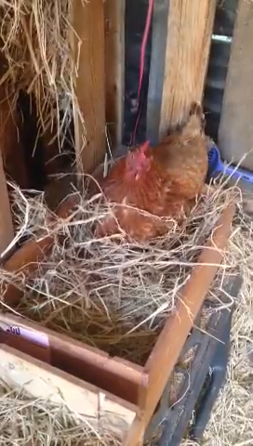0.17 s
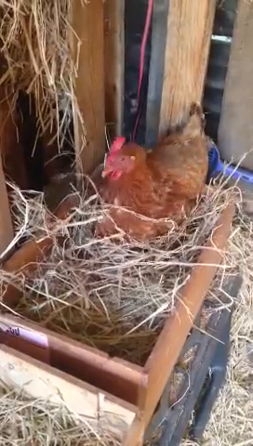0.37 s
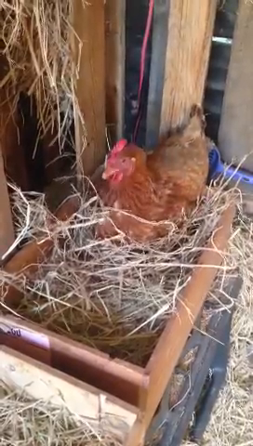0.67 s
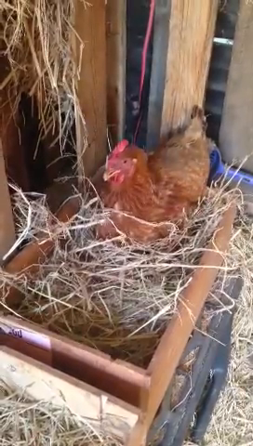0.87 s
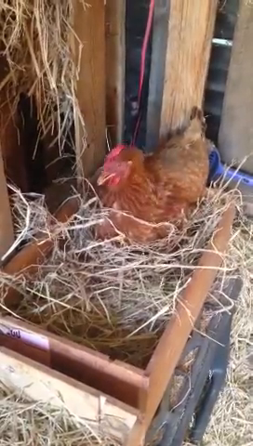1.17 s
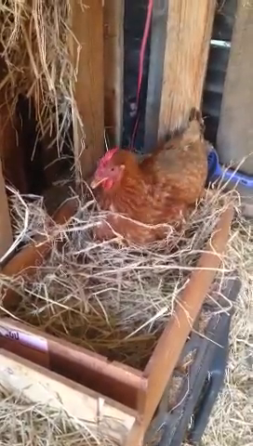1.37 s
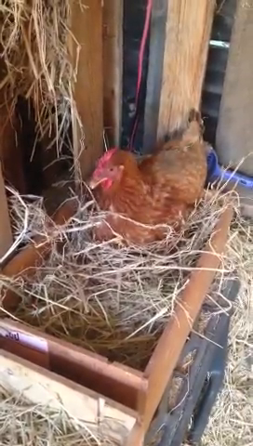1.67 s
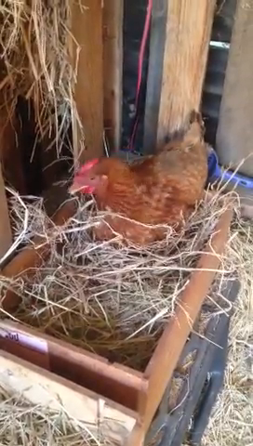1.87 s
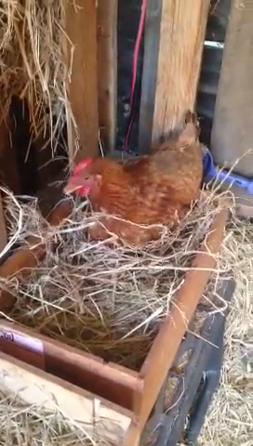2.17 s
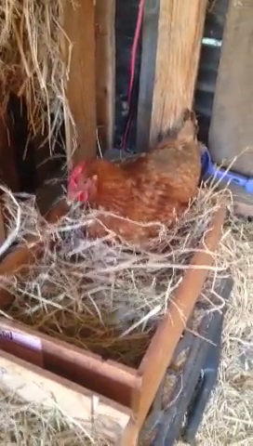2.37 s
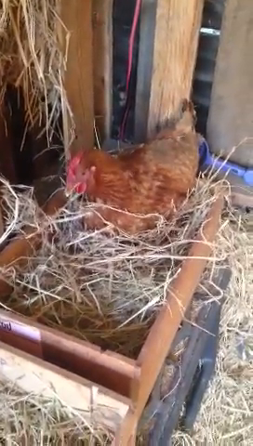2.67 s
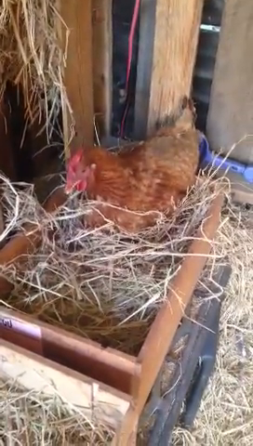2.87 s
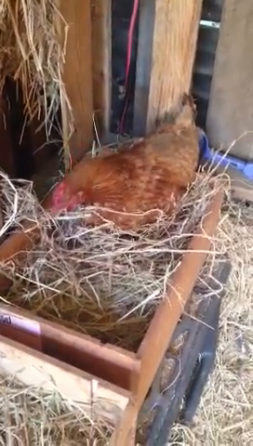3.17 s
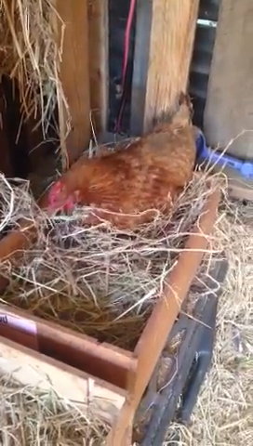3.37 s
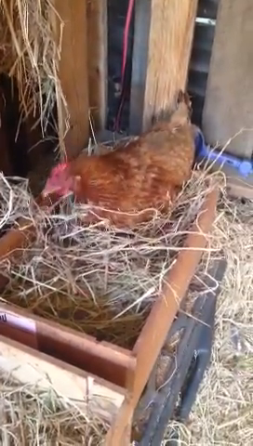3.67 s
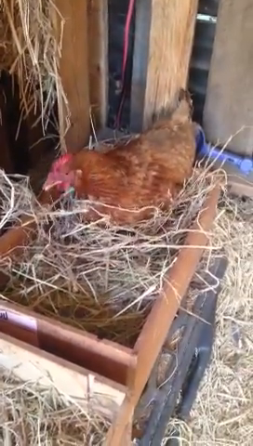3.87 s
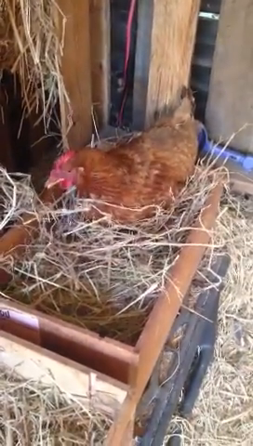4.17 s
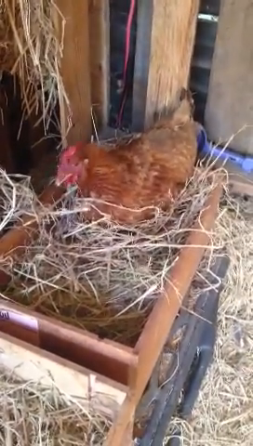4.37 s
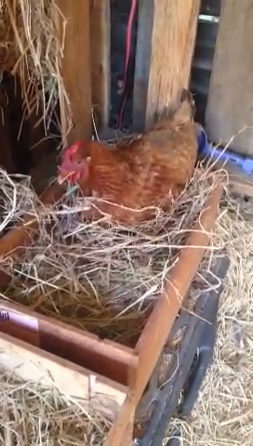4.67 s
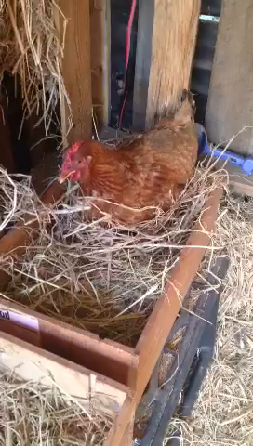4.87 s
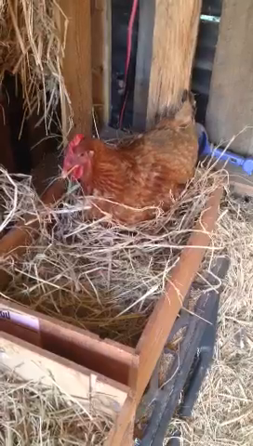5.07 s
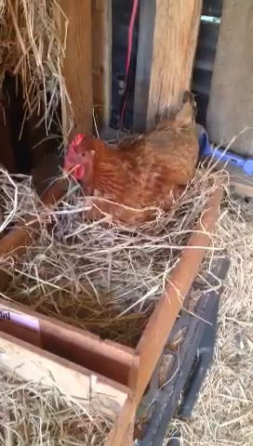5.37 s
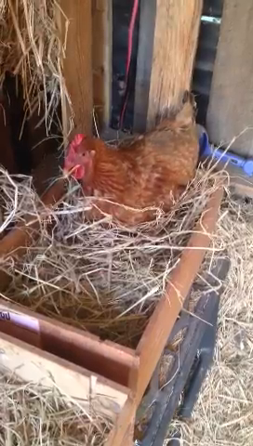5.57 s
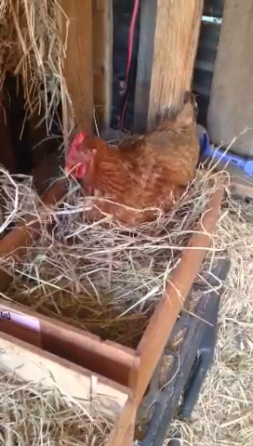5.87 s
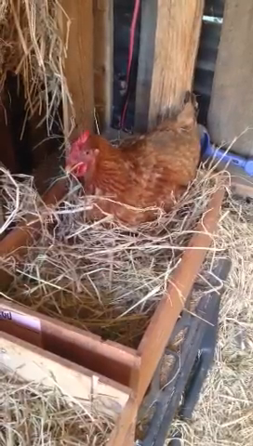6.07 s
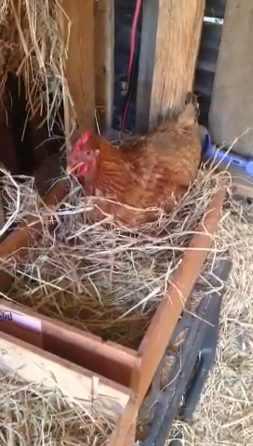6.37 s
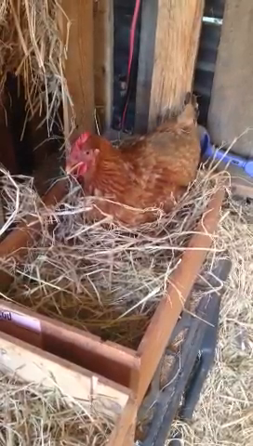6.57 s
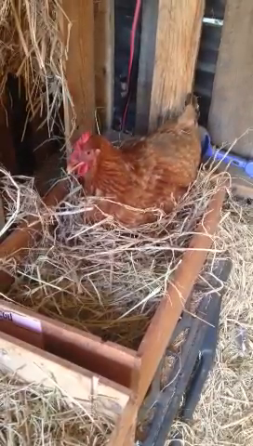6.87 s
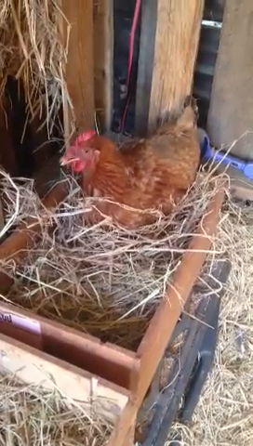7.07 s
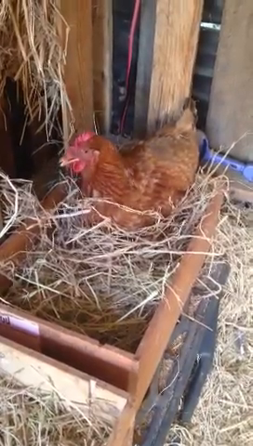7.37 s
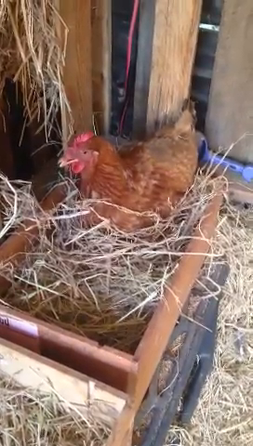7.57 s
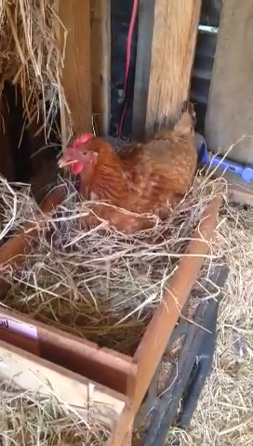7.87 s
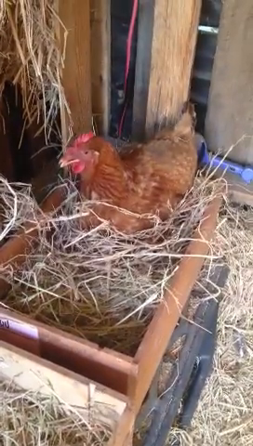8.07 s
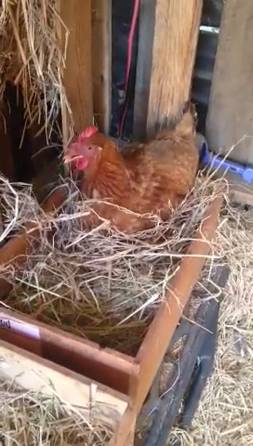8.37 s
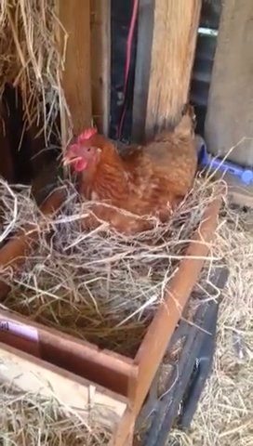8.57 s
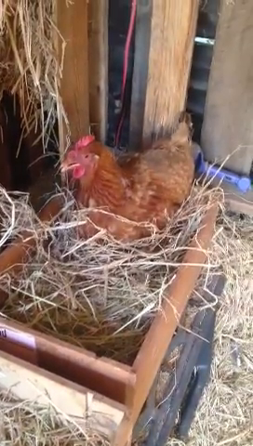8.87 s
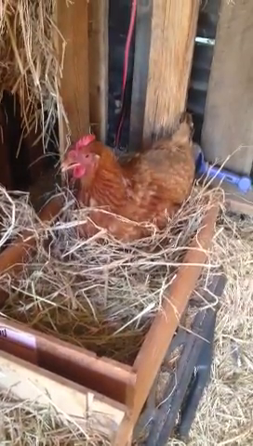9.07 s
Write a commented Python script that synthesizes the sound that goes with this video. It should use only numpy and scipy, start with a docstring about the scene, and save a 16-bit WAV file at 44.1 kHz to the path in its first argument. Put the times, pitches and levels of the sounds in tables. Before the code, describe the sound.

A hen hisses, draws out one swelling moan, then clucks in a fast, even run that grows louder and harsher.

```python
"""A straw-lined nest box in a quiet shed: a hen hisses, draws out one swelling moan, then clucks in a
fast, ever harsher run. Her voice has two registers: a rasp of uneven membrane slaps whose rate climbs
at the start of each cluck, and a clear tone near 470 Hz. Throat and beak resonances colour both.
Straw cracks under her twice; the wooden box adds a short ring."""
import sys
import numpy as np
from scipy import signal
from scipy.fft import rfft, irfft
from scipy.io import wavfile
from scipy.ndimage import uniform_filter1d

SR = 44100
rng = np.random.default_rng(int(sys.argv[2]) if len(sys.argv) > 2 else 0)


def pcm_store(signal):
    """Save signal as 16-bit PCM."""
    levels = np.round(np.clip(np.atleast_2d(signal), -1, 1) * 32767)
    wavfile.write(sys.argv[1], SR, levels.astype(np.int16).T)


N = 405719
TIME = np.arange(N) / SR
FREQS = np.fft.rfftfreq(8192, 1 / SR)

# Moan contour: time_s, pitch_hz, level_db
MOAN = [(0.5, 593, -54), (0.53, 541, -46.5), (0.654, 526, -52.5), (0.688, 575, -53.5), (0.738, 510, -43.5),
        (0.78, 549.6, -48.5), (0.994, 474, -38.5), (1.072, 550, -38), (1.14, 476.4, -33),
        (1.248, 487, -27.5), (1.278, 558, -35.5), (1.3, 567, -51)]
# Clucks: start_s, length_s, level_db, swell_db, treble_re_level_db, mouth_re_level_db,
# clear_after_s, clear_for_s, clear_pitch_hz, glide_hz, residual_rasp_share
CLUCKS = [ (1.443, 0.11, -32, -10.5, -44, -24, 0.0031, 0.079, 485.7, -30, 0.17),
          (1.508, .14, -35, 9.5, -29, -10, 0, .138, 486.5, 50, 0.28),
          (1.759, 0.14, -33, -1.5, -44, -36, 0.0017, 0.13, 502, 3, 0.06),
          (2.023, .13, -32, 9, -43.5, -31, 0.011, 0.11, 462, 12, 0.1),
          (2.264, .101, -25.5, 1.5, -20, -17, 0.0083, .1, 466, -12, .13),
          (2.5, .09, -25, -0.5, -28.5, -11, 0.001, 0.081, 452, 9.5, 0.37),
          (2.715, 0.1, -25.5, 4.5, -21.5, -8, 0, 0.089, 444, -20, 0.37),
          (2.962, 0.1048, -26, 7, -19, -8.5, .036, .068, 471, 35.5, 0.21),
          (3.195, 0.081, -20, -0.5, -36, -30, 0.0051, 0.069, 468, 19.5, 0.13),
          (3.4, .096, -20.5, -2, -35, -32, 0.002, .096, 453, -3, 0.19),
          (3.609, 0.086, -21, 8.5, -18, -11, 0.0032, 0.074, 458, -10, 0.34),
          (3.835, 0.085, -25, 10, -10, -3.5, 0.032, 0.046, 458, 9, 0.46),
          (4.04, .094, -24, 1.5, -12, -7, 0.044, 0.041, 468, 40, 0.5),
          (4.265, .124, -23, 3.5, -13.5, -8, .045, 0.081, 467, 44, 0.54),
          (4.515, .115, -24.5, -0.5, -11.5, -8.5, .057, .053, 460, 37.5, 0.5),
          (4.738, 0.1, -23.5, 0.5, -10.5, -7.5, 0.062, 0.025, 480, 24.5, 0.4),
          (4.947, 0.098, -24, -3, -9, -7.5, 0.042, .02, 490, 29, 0.8),
          (5.173, 0.098, -23, -4, -13.5, -8, 0.07, 0.042, 492, 65.5, 0.7),
          (5.399, 0.11, -22.5, -3.5, -11.5, -7.5, 0.07, .045, 475, 13.5, 0.8),
          (5.643, 0.15, -25, -4, -9, -6, 0.12, .03, 478, 35, 0.8),
          (5.899, 0.11, -23.5, 1.5, -9.5, -6.5, .058, .021, 453, -26.5, 0.9),
          (6.129, 0.1, -24, -4.5, -7.5, -7, 0.052, 0.047, 494, -13, 0.5),
          (6.328, 0.11, -23, 0, -7, -5.5, 0.054, 0.078, 469, -29.5, .52),
          (6.54, .088, -23, -3, -8, -5, .045, .04, 466, -49, 0.7),
          (6.615, 0.047, -25, -5, -4.5, -3.5, .036, .015, 460, -10, 0.5),
          (6.752, 0.073, -22.5, 10.5, -7, -5.5, 0.045, 0.041, 497, -42.5, .82),
          (6.962, 0.13, -22.5, 0, -8.5, -3.5, 0.065, .044, 454, -10, 0.42),
          (7.201, 0.14, -25.5, -7.5, -8.5, -4.5, 0.061, 0.046, 467, -45, 0.5),
          (7.428, 0.093, -25, -4, -6, -4.5, 0.073, 0.03, 460, -23.5, .85),
          (7.639, 0.13, -23.5, 1, -6.5, -3.5, 0.057, 0.022, 458, -19.5, 0.7),
          (7.893, 0.15, -25, -4, -5.5, -3.5, 0.055, 0.032, 475, -36, .41),
          (8.207, 0.17, -22, -4, -8.5, -2.5, 0.081, 0.036, 468, -50.5, 0.4),
          (8.522, .124, -23, -2.5, -7.5, -4, 0.07, 0.037, 474.4, -20, .28),
          (8.641, 0.065, -21.5, 6, -4.5, 0.5, .034, .024, 466, -23.5, 0.54),
          (8.877, 0.21, -22, 1, -8.5, -3.5, .086, .068, 448.2, -19, 0.5)]
# Lower throat resonances: centre_hz, width_hz, gain_db
THROAT_MODES = [(229.4, 56, -15.5), (390, 40, -26.5), (481, 160, -21.5), (724.2, 40, -5.5),
                (864.2, 53, 4.5), (1020, 150, -6)]


def undb(db):
    """Decibels to gain."""
    return 10 ** (np.asarray(db) / 20)


def unit(x):
    """Scale to rms 1."""
    return x / np.sqrt(np.mean(x ** 2))


def ramp(x):
    """Limit to 0-1."""
    return np.clip(x, 0, 1)


def arc(progress, from_db):
    """Rounded rise from from_db to unity over progress 0-1."""
    foot = np.sqrt(undb(from_db))
    return (foot + (1 - foot) * ramp(progress)) ** 2


def gate(start_s, end_s, edge_s):
    """1 between two times, with linear flanks."""
    return ramp(np.minimum(TIME - start_s, end_s - TIME) / edge_s + .5)


def smooth(x, span_s):
    """Triangular running mean."""
    size = max(1, int(span_s * SR))
    return uniform_filter1d(uniform_filter1d(x, size), size)


def even(x):
    """Hold short-term rms at 1; single pulses still differ."""
    return x / np.sqrt(np.abs(smooth(x ** 2, .016)) + 1e-4 * np.mean(x ** 2))


def walk(rate_hz):
    """Smooth random drift, rms 1."""
    return unit(smooth(rng.standard_normal(N), 1 / rate_hz))


def colour(x, gain):
    """Minimum-phase filter with the given gain at FREQS."""
    cepstrum = irfft(np.log(gain + 1e-7))
    half = len(cepstrum) // 2
    cepstrum[1:half] *= 2
    cepstrum[half + 1:] = 0
    impulse = irfft(np.exp(rfft(cepstrum)))[:half]
    return signal.fftconvolve(x, impulse)[:N]


def resonate(x, modes, tuning=1):
    """Steep-sided resonances (centre_hz, width_hz, gain_db); tuning scales the centres."""
    f = FREQS + 1
    power = 0
    for hz, width_hz, db in modes:
        detune = (f - (hz * tuning) ** 2 / f) / (2 * width_hz)
        power += undb(db) ** 2 / (1 + 2 * detune ** 2) ** 2
    return colour(x, np.sqrt(power))


def split(x, hz):
    """Bands below and above hz."""
    low = signal.sosfiltfilt(signal.butter(4, hz, fs=SR, output="sos"), x)
    return low, x - low


def clicks(times_s, sizes):
    """Band-limited impulses at exact times."""
    out, taps = np.zeros(N), np.arange(-8, 9)
    at = np.asarray(times_s)[:, None] * SR
    index = at.astype(int) + taps
    pulses = np.asarray(sizes)[:, None] * np.sinc(index - at) * np.hanning(len(taps))
    np.add.at(out, np.clip(index, 0, N - 1), pulses)
    return out


def shed(level_db=-63.5, drift_db=-.46):
    """Quiet background air, wavering slightly in level."""
    # Air spectrum: freq_hz, relative_density_db
    spectrum = [(15, -59.5), (25, -30.5), (169, -5.5), (240, -11), (349, -2.5), (433, -10.5), (537, -9),
                (666, -17), (1340, -16.5), (1900, -22.5), (3530, -23), (14300, -25.5), (15500, -24.5)]
    hz, db = np.transpose(spectrum)
    gain = undb(np.interp(np.log(FREQS + 1), np.log(hz), db))
    air = colour(rng.standard_normal(N), gain)
    return unit(air) * undb(level_db + drift_db * walk(19))


def nest_box(x, ring_hz=1010, ring_t60_s=.16, ring_db=-15, tail_db=-19, tail_t60_s=.17, damp_hz=3500):
    """Close boards reflect, the air in the box rings, the shed adds a short dull tail."""
    # Board echoes: delay_s, gain_db
    echoes = [(.0042, -17), (.0086, -21.5), (0.0162, -12)]
    t = TIME[:SR // 2]
    delays_s, db = np.transpose(echoes)
    boards = clicks(delays_s, undb(db))[:len(t)]
    fade = undb(-60 * t / ring_t60_s)
    ring = 2 * np.cos(2 * np.pi * ring_hz * t) * fade / fade.sum()
    tail = rng.standard_normal(len(t)) * undb(-60 * t / tail_t60_s) * (t > .006)
    tail = signal.sosfilt(signal.butter(1, damp_hz, fs=SR, output="sos"), tail / np.linalg.norm(tail))
    return x + signal.fftconvolve(x, boards + undb(ring_db) * ring + undb(tail_db) * tail)[:N]


def straw(decay_s=.015):
    """Dry stalks give way, each in a short crackle."""
    # Stalk cracks: start_s, level_db
    cracks = [(2.199, -61.5), (8.437, -58)]
    envelope = sum(undb(db) * (TIME > s) * np.exp(-np.abs(TIME - s) / decay_s) for s, db in cracks)
    return envelope * unit(resonate(rng.standard_normal(N), [(2400, 1200, -1), (4800, 2900, -3.5)]))


def hiss():
    """Unvoiced turbulence through throat and open beak."""
    # Breath contour: time_s, level_db
    contour = [(0, -56), (.1, -51), (.28, -46.5), (.41, -46.5), (.44, -77), (.59, -72), (.62, -47),
               (.66, -52.5), (.7, -71), (1.0, -65.5), (1.27, -60), (1.33, -89.5)]
    # Airway resonances: centre_hz, width_hz, gain_db
    airway_modes = [(863, 180, 10), (1251, 83, 10.5), (1586, 74, 3), (2300, 570, -13.5), (3820, 600, -15)]
    air = even(resonate(rng.standard_normal(N), airway_modes))
    return air * undb(np.interp(TIME, *np.transpose(contour)))


def pops():
    """The airway opens before some clucks: one slap rings the throat."""
    # Airway openings: time_s, peak_db
    openings = [(1.429, -47), (1.748, -49), (2.005, -45), (2.248, -44), (2.487, -38), (2.694, -43.5),
                (2.942, -30.5), (3.175, -42.5), (3.383, -39), (3.596, -39.5), (3.822, -30), (4.036, -30.5),
                (4.938, -37)]
    times_s, db = np.transpose(openings)
    ring = resonate(clicks(times_s, undb(db)), THROAT_MODES)
    return ring * undb(db.max()) / np.abs(ring).max()


def throat(slaps, calls, shut_ratio=.98, open_ratio=1.022, lift_at_s=.027, lift_s=.043):
    """Lower throat resonances start low in each call and rise as it opens."""
    lift = ramp(sum(gate(start + lift_at_s, end + lift_s / 2, lift_s) for start, end in calls))
    shut, wide = (resonate(slaps, THROAT_MODES, ratio) for ratio in (shut_ratio, open_ratio))
    return even((1 - lift) * shut + lift * wide)


def beak(x, shift=.026, notch_hz=2960, notch_width_hz=170, notch_db=-9):
    """Resonances drift as the open beak moves; a side cavity absorbs a band and its third multiple."""
    # Open-beak resonances: centre_hz, width_hz, gain_db
    open_modes = [(2039, 127, -7.5), (2350, 47, -18.5), (2452, 78, 6.5), (2200, 27, 0.5),
                  (2930, 210, -12.5), (3466, 130, -8.5), (3430, 83, -8.5), (3836, 50, -12.5),
                  (4330, 390, -15), (5273, 220, -16), (6490, 280, -21), (7700, 500, -27.5),
                  (10340, 2500, -37.5), (14100, 5200, -38)]
    lean = ramp(.5 + .45 * walk(18))
    low, high = (resonate(x, open_modes, ratio) for ratio in (1 - shift, 1 + shift))
    notches = sum(np.exp(-((FREQS / k - notch_hz) / notch_width_hz) ** 2) for k in (1, 3))
    return even(colour((1 - lean) * low + lean * high, undb(notch_db * notches)))


def rasp(bright_db, slack_hz=208, climb_hz_per_s=5200, relax_s=.018, arch_s=.055, jitter_s=.00004,
         loose_spread=.076, pressed_spread=.014, scatter_db=3.65, limp_db=.6, air_db=-13, air_s=.0023):
    """In each cluck membranes slap faster as they tighten, then slacken; each slap frees a puff of air."""
    # Top slap rate, rising with excitement: time_s, rate_hz
    top_rates = [(4.3, 323.8), (5.7, 334.8), (7.3, 350.4)]
    # Pressed hard they lock to one rate; otherwise they stumble.
    stumble = np.interp(bright_db, [-19, -11], [loose_spread, pressed_spread])
    times_s, sizes_db = [], []
    for start_s, length_s, *_ in CLUCKS:
        age_s = 0
        taut_hz = np.interp(start_s, *np.transpose(top_rates)) * (1 + .012 * rng.standard_normal())
        span_hz = taut_hz - slack_hz
        for count, (stretch, slip, size) in enumerate(rng.standard_normal(size=(120, 3))):
            if age_s >= length_s:
                break
            taut = ramp(age_s * climb_hz_per_s / span_hz) * ramp((length_s - age_s) / relax_s)
            times_s.append(start_s + age_s + jitter_s * slip)
            sizes_db.append(scatter_db * size + limp_db * taut * (-1) ** count)
            spread = pressed_spread + taut * (stumble[int((start_s + age_s) * SR)] - pressed_spread)
            droop = .05 * min((age_s / arch_s - 1) ** 2, 1)  # rate peaks at arch_s
            age_s += np.exp(spread * stretch + droop) / (slack_hz + taut * span_hz)
    slaps = clicks(times_s, undb(sizes_db))
    airflow = signal.lfilter([1], [1, -np.exp(-1 / (air_s * SR))], np.abs(slaps))
    puffs = airflow * rng.standard_normal(N)
    air = unit(puffs) + 2 * unit(split(puffs, 2700)[1])
    return unit(slaps) + undb(air_db) * unit(air)


def tone(pitch_hz, level_db, gape, round_db=-17, onset_db=18, onset_s=.23, open_db=5, air_db=-14,
         thin_hz=4600, thin_db=-7, thin_until_s=1.9):
    """Clear register: quavering harmonics, the second dominant when loud. Returns body, treble."""
    # Low overtones: harmonic_number, relative_db
    partials = [(2, 10.5), (3, -18), (4, -24)]
    # Resonances with the beak nearly shut: centre_hz, width_hz, gain_db
    shut_modes = [(1920, 130, 4.5), (2180, 80, -3), (2756, 360, 1.5), (4620, 500, -32.5)]
    softness = np.interp(level_db, [-35, -25], [1, .15])
    quaver = softness * np.sin(2 * np.pi * np.cumsum(30 + 9 * walk(25)) / SR)
    waver = .008 * walk(260) + .016 * quaver
    flutter = undb(1.4 * walk(80) + 3.3 * quaver)
    phase = 2 * np.pi * np.cumsum(pitch_hz * (1 + waver)) / SR
    overtones = sum(undb(db) * np.sin(round(k) * phase) for k, db in partials)
    # Soft voicing is rounder; the moan begins almost as a sine.
    soft_db = -.72 * (np.clip(level_db, -45, -22) + 30.5)
    onset = np.exp(-np.abs(TIME - MOAN[0][0]) / onset_s)
    fundamental = undb(round_db + soft_db + onset_db * onset + open_db * gape)
    body = (unit(overtones) + fundamental * unit(np.sin(phase))) / np.sqrt(1 + fundamental ** 2)
    buzz = unit(sum(np.cos(k * phase) for k in range(4, 20)))
    buzz += undb(air_db) * 2 * rng.standard_normal(N) * (1 + np.cos(phase))
    # The first, pinched calls carry a thin high overtone.
    thin = undb(thin_db) * gate(0, thin_until_s, .4) * even(resonate(buzz, [(thin_hz, 220, 0)]))
    treble = np.sqrt(1 - gape) * even(resonate(buzz, shut_modes)) + np.sqrt(gape) * beak(buzz) + thin
    return body * flutter, treble * flutter


def moan(treble_db=-29, mouth_db=-28, peak_thinning=.2):
    """The moan swells as a clear, quavering tone. Returns controls for voice."""
    times_s, hz, db = np.transpose(MOAN)
    loudness = undb(np.interp(TIME, times_s, db))
    thinning = peak_thinning * loudness / loudness.max()  # the tone thins slightly at its peak
    pitch_hz = np.interp(TIME, times_s, hz)
    return loudness, treble_db, mouth_db, thinning, pitch_hz


def clucks(gape, soft_attack_s=.012, harsh_attack_s=.023, release_s=.021,
           overshoot_db=4, overshoot_at_s=.022, rebound_s=.058, settle_s=.037,
           press_db=-3, press_at_s=.061, press_s=.015, flip_s=.0064, sag_hz=25.94, arch_hz=14,
           clear_treble_db=-29.5, clear_mouth_db=-21.5, clear_gain_db=2.5,
           lag_db=-12, lag_s=.0082, fade_db=-4, end_db=-10, mouth_fade_db=-2.5):
    """Each push of air overshoots, rasps, turns clear and lets go. Returns controls for voice."""
    rows = np.array(CLUCKS)
    current = np.maximum(np.searchsorted(rows[:, 0], TIME + .002) - 1, 0)
    (start_s, length_s, level_db, swell_db, treble_db, mouth_db,
     clear_after_s, clear_for_s, centre_hz, glide_hz, rough) = rows[current].T
    age_s = np.clip(TIME - start_s, 0, length_s)
    progress = age_s / length_s
    release = ramp((length_s - age_s) / release_s)

    break_s = start_s + clear_after_s
    clear = (1 - rough) * gate(break_s - flip_s / 2, break_s + clear_for_s + flip_s / 2, flip_s)
    eased = smooth(clear, 2 * flip_s)  # the throat changes slowly between registers
    through = ramp((TIME - break_s) / clear_for_s) - .5
    bend_hz = arch_hz * gape - sag_hz * (1 - gape)  # soft tones sag, harsh ones arch
    pitch_hz = centre_hz + glide_hz * through + bend_hz * np.cos(2 * np.pi * through) / 2

    attack_s = soft_attack_s + gape * (harsh_attack_s - soft_attack_s)
    envelope = arc(age_s / attack_s, from_db=-13.5) * arc(release, from_db=-21)
    rebound = np.cos(2 * np.pi * (age_s - overshoot_at_s) / rebound_s)
    push_db = overshoot_db * rebound * np.exp(-age_s / settle_s)
    # A taut rasp is squeezed: less body, as much treble.
    push_db += press_db * gape * (1 - eased) * np.exp(-((age_s - press_at_s) / press_s) ** 2)
    effort_db = level_db + swell_db * (progress - .5) + push_db + clear_gain_db * eased * gape

    # Treble comes late, fades and leaves first.
    shape_db = lag_db * np.exp(-age_s / lag_s) + fade_db * progress + end_db * (1 - release)
    bright_db = treble_db + eased * (clear_treble_db - treble_db) + gape * (shape_db - push_db)
    wide_db = mouth_db + eased * (clear_mouth_db - mouth_db) + mouth_fade_db * (progress - .5)
    return envelope * undb(effort_db), bright_db, wide_db, 1 - clear, pitch_hz


def voice(opens_at_s=3.55, opening_s=.55, body_db=-1, mouth_trim_db=-1, swing_s=.011):
    """Moan and clucks: effort sets level, vowel and treble; clucks flip between rasp and tone."""
    # Upper throat resonances, strong with the mouth wide: centre_hz, width_hz, gain_db
    mouth_modes = [(1182, 77, 8), (1278, 74, -4), (1458, 96, -12), (1767, 130, -15)]
    calls = [(MOAN[0][0], MOAN[-1][0])] + [(start, start + length) for start, length, *_ in CLUCKS]
    sounding = ramp(sum(gate(start + .001, end, .004) for start, end in calls))
    gape = ramp((TIME - opens_at_s) / opening_s)  # the beak opens as the run gathers force
    moaning = TIME < (MOAN[-1][0] + CLUCKS[0][0]) / 2
    controls = (np.where(moaning, a, b) for a, b in zip(moan(), clucks(gape)))
    loudness, bright_db, wide_db, blend, pitch_hz = (smooth(c, .002) for c in controls)
    bright_db, blend = np.minimum(bright_db, -3), ramp(blend)

    # blend turns the tone down and, in clucks, the rasp up.
    slaps = rasp(bright_db)
    tone_body, tone_treble = tone(pitch_hz, 20 * np.log10(loudness), gape)
    body = blend * throat(slaps, calls) + np.sqrt(1 - blend ** 2) * tone_body
    wide = np.minimum(undb(wide_db + mouth_trim_db), .9)
    body = np.sqrt(1 - wide ** 2) * body + wide * even(resonate(slaps, mouth_modes))
    treble = np.sqrt(blend) * beak(slaps) + np.sqrt(1 - blend) * tone_treble

    # Membranes meet hard only at full swing; harder slaps are sharper.
    hard = ramp(sum(gate(start + swing_s, end - swing_s, .0042) for start, end in calls))
    sharp_db = -2 + .88 * np.maximum(bright_db + 11.5, 0)
    ring, edge = split(treble, 3000)
    treble = ring + edge * (.18 + 1.023 * hard) * undb(sharp_db)
    return sounding * loudness * (undb(body_db) * body + undb(bright_db) * treble)


def scene():
    """Hen and straw in the box, over the shed air; mono."""
    return (nest_box(voice() + pops() + hiss() + straw()) + shed())[None]


def record(dry, low_hz=115, top_hz=15250):
    """Phone microphone: thin bass, steep top cut."""
    thin = signal.sosfilt(signal.butter(2, low_hz, "highpass", fs=SR, output="sos"), dry)
    return signal.sosfilt(signal.ellip(10, .2, 80, top_hz, fs=SR, output="sos"), thin)


dry = scene()
out = record(dry)
pcm_store(out)
```